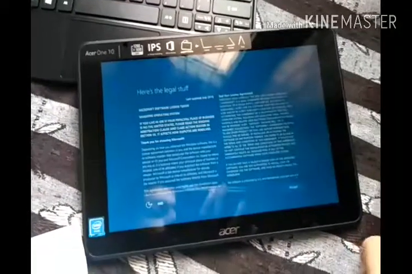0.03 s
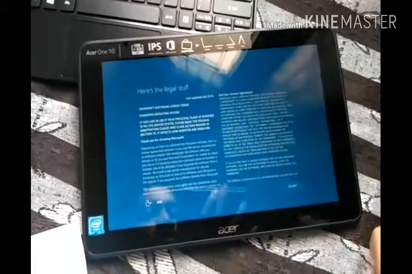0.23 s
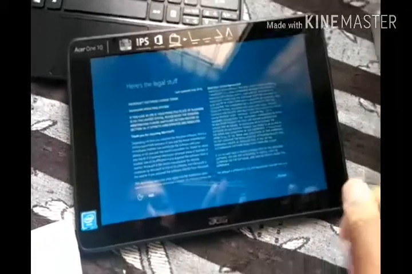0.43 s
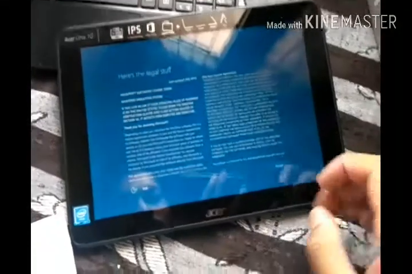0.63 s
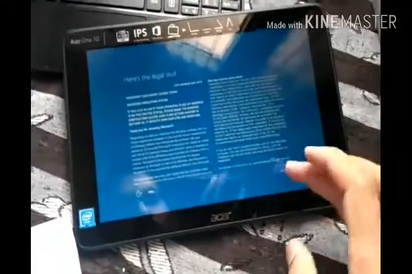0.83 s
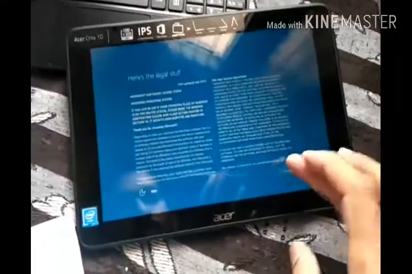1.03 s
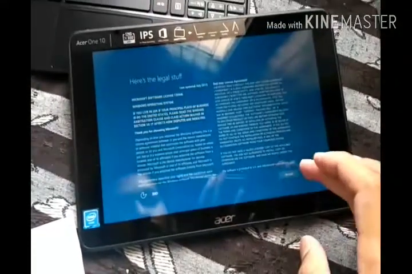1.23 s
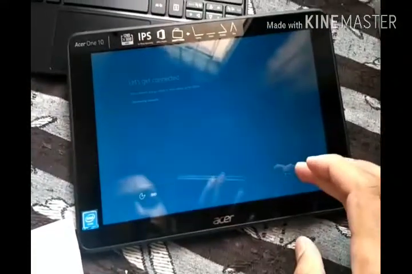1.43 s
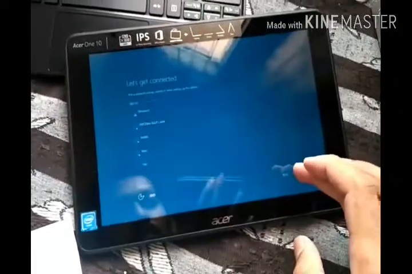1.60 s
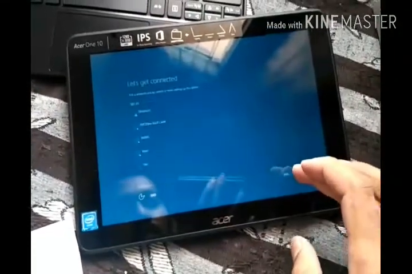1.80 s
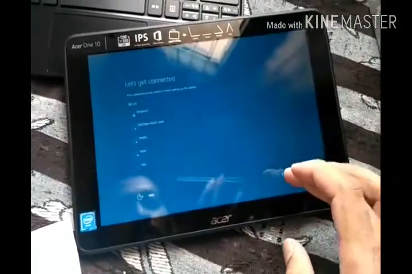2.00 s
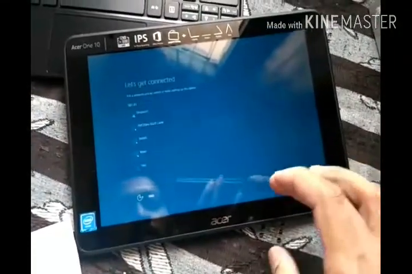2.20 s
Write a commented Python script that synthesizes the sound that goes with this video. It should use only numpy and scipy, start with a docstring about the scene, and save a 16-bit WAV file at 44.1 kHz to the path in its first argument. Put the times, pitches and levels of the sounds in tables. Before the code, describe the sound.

One sharp plastic click from a handled tablet, then a soft tap and faint rustling.

```python
"""A tablet's plastic case gives one sharp click as a hand handles it on a cloth-covered table.
The snap excites the case's resonances, a faint boom of the table and the small, quiet room.
A dull tap and a few faint touches follow, skin and cloth rustle, and twice the hand-held
microphone rumbles. Background rush and hum rise with each sound and sink back,
as through a noise suppressor."""
import sys
import numpy as np
from scipy import signal
from scipy.fft import rfft, irfft
from scipy.io import wavfile

SR = 44100
rng = np.random.default_rng(int(sys.argv[2]) if len(sys.argv) > 2 else 0)


def to_wav(sig):
    """Store sig (one row per channel, or 1-D mono) as 16-bit WAV at the path in sys.argv[1].

    Samples outside -1..1 are clipped; the rate is SR.
    """
    pcm = np.clip(np.atleast_2d(sig), -1, 1) * 32767
    pcm = np.round(pcm).astype(np.int16)
    wavfile.write(sys.argv[1], SR, pcm.T)  # frames by channels


N = 103635
T = np.arange(N) / SR

# level curve of the suppressed background noise: (time [s], level [dB])
SUPPRESSED_NOISE_LEVEL = [(0, -53), (.06, -56), (.115, -62.5), (.15, -53.5), (.21, -52), (.3, -52),
                          (.38, -57), (.45, -62), (.5, -60.5), (.62, -67.5), (.636, -56), (.73, -59),
                          (.76, -62.5), (.8, -59), (.98, -70), (1.06, -63), (1.2, -68.5), (1.36, -71.5),
                          (1.395, -64), (1.47, -68), (1.52, -65.5), (1.665, -69.5), (1.705, -53.5),
                          (1.82, -53.5), (1.92, -57.5), (2.03, -66), (2.15, -70), (2.35, -72)]
# spectrum of the background rush: (frequency [Hz], relative density [dB])
RUSH_SPECTRUM = [(25, -23), (60, 0.5), (100, 0), (180, 1.5), (280, -7.5), (400, -4.5), (600, -4), (800, -9),
                 (1100, -7), (2000, -14.5), (3200, -18.5), (5000, -30.5), (7500, -33.5), (10000, -31.5),
                 (12300, -26.5), (15000, -34.5)]
# tones of the hum: (frequency [Hz], level relative to the rush [dB])
HUM_TONES = [(104, -13), (146, -8), (195, -16), (247, -22), (365, -17), (630, -21)]
# shudders of the microphone: (start [s], duration [s], level [dB], frequency [Hz])
RUMBLES = [(.13, .07, -44, 52.2), (1.686, 0.045, -42.5, 62.2), (1.776, .075, -38.5, 61.3)]
# spectrum of the noise in a shudder: (frequency [Hz], relative density [dB])
RUMBLE_SPECTRUM = [(20, -24), (45, -8), (90, 4), (150, -8.5), (300, -26), (1000, -50)]
# brushes of the hand: (centre time [s], standard deviation [s], level [dB], centre frequency [Hz])
RUSTLES = [(.495, .012, -62, 992), (.725, 0.013, -62, 1310), (1.06, 0.014, -64.5, 1700),
           (1.17, 0.019, -72, 980), (1.508, 0.0049, -65.5, 1030), (1.542, 0.018, -69, 1070),
           (1.721, 0.011, -62, 2200), (1.776, 0.0044, -59.5, 1180), (1.825, 0.039, -61, 1070)]
# finger contacts: (time [s], level [dB], frequency [Hz], relative level of the hollow ring [dB])
TAPS = [(.010, -53.5, 500, 9.5), (.032, -51.5, 480, 9.5), (0.6324, -28.5, 380, -36.5),
        (.785, -51, 154, -26), (1.054, -57.5, 128, -18), (1.22, -57.5, 450, -20), (1.385, -60, 129, -20)]
# spectrum of a tap's reverberation: (frequency [Hz], relative density [dB])
TAP_REVERB_SPECTRUM = [(60, -21.5), (130, -5), (220, -4.5), (340, 4), (600, -5), (780, -13.5), (960, -3.5),
                       (1600, -19.5), (4000, -40)]
# the snap and its rebounds: (time [s], impulse level [dB])
SNAP_IMPULSES = [(0.2367, -2), (.23862, -16.5), (0.239, -17.5), (0.2407, -18.5)]
# the case's resonances and one antiresonance: (frequency [Hz], bandwidth [Hz], gain [dB])
CASE_RESONANCES = [(1647, 210, 14), (2120, 310, 9.5), (3850, 300, 5.5), (4870, 400, 7.5), (5650, 700, 5),
                   (7350, 970, -6), (9190, 400, 7), (10750, 700, 3.5), (11880, 400, 8.5), (12620, 260, 8.5),
                   (13640, 260, 8.5)]
# lightly damped modes of the case: (frequency [Hz], level [dB], 60 dB decay time [s])
RINGING_MODES = [(1729, -50.5, .25), (1895, -44, 0.25), (2050, -49, .22), (11940, -48, .28)]
# spectrum of the click's reverberation: (frequency [Hz], relative density [dB])
CLICK_REVERB_SPECTRUM = [(300, -15.5), (900, -10), (1400, -7), (1900, 0), (3000, -4.5), (4300, -10.5),
                         (5300, -6), (7400, -8.5), (9200, -5.5), (12300, -1.5), (15000, -9)]

CLICK_S = SNAP_IMPULSES[0][0]


def from_db(db):
    """Amplitude grows tenfold for every 20 dB."""
    return 10 ** (np.asarray(db) / 20)


def unit_rms(x):
    """Division by the RMS value gives unit power."""
    return x / np.sqrt(np.mean(x ** 2) + 1e-20)


def coloured_noise(spectrum):
    """Spectral weighting colours white noise; the result has unit power."""
    hz, db = np.transpose(spectrum)
    bin_hz = np.maximum(np.arange(N // 2 + 1) * SR / N, 1)
    gain = from_db(np.interp(np.log(bin_hz), np.log(hz), db))
    return unit_rms(irfft(rfft(rng.standard_normal(N)) * gain, N))


def drift(rate_hz):
    """Low-pass filtering turns white noise into a slow fluctuation of about unit power."""
    pole = np.exp(-2 * np.pi * rate_hz / SR)
    smoothed = signal.lfilter([1], [1, -2 * pole, pole * pole], rng.standard_normal(N + SR))
    return unit_rms(smoothed)[SR:]


def butterworth(x, hz, kind, order=2):
    """A high- or low-pass filter with a maximally flat passband."""
    return signal.sosfilt(signal.butter(order, hz, kind, fs=SR, output="sos"), x + 1e-18)


def resonance(x, hz, width_hz):
    """Forced response of a damped oscillator, with unit peak gain."""
    radius = np.exp(-np.pi * width_hz / SR)
    feedback = [1, -2 * radius * np.cos(2 * np.pi * hz / SR), radius ** 2]
    return signal.lfilter(np.array([1, 0, -1]) * (1 - radius ** 2) / 2, feedback, x + 1e-18)


def decay(start, t60_s):
    """Exponential damping: a sudden onset, then 60 dB lost every t60_s."""
    return (T >= start) * np.exp(-np.log(1000) * np.maximum(T - start, 0) / t60_s)


def damped_mode(start, hz, t60_s):
    """Free vibration of one mode is a decaying sinusoid."""
    return np.sin(2 * np.pi * hz * (T - start)) * decay(start, t60_s)


def background_noise():
    """Amplitude modulation: rush and hum follow a set curve, as through a noise suppressor, over a drone."""
    hum = sum(from_db(db) * np.sqrt(2) * np.sin(2 * np.pi * hz * T + drift(rate_hz=3))
              for hz, db in HUM_TONES)
    drone = rng.standard_normal(N)
    for _ in range(2):
        drone = resonance(drone, hz=60, width_hz=14)
    gain = from_db(np.interp(T, *np.transpose(SUPPRESSED_NOISE_LEVEL)))
    return from_db(-76.5) * unit_rms(drone) + gain * (coloured_noise(RUSH_SPECTRUM) + hum)


def hand_rustles(quality_factor=2.5):
    """Friction of skin and cloth makes grainy noise, heard in short band-limited swells."""
    grain = from_db(4.5 * drift(rate_hz=121))
    friction = butterworth(grain * rng.standard_normal(N), 3280, "low", order=4)
    out = np.zeros(N)
    for centre, spread, db, hz in RUSTLES:
        swell = np.exp(-((T - centre) / spread) ** 2 / 2)
        out += from_db(db) * swell * unit_rms(resonance(friction, hz, hz / quality_factor))
    return out


def microphone_rumble(ramp_s=0.014):
    """Structure-borne sound: the hand shakes the microphone, giving a low, unsteady tone and noise."""
    rub = from_db(-5.5) * coloured_noise(RUMBLE_SPECTRUM)
    wander = 1 + 0.041 * drift(rate_hz=20)
    out = np.zeros(N)
    for start, duration, db, hz in RUMBLES:
        swell = np.clip(np.minimum(T - start, start + duration - T) / ramp_s, 0, 1)
        cycles = np.cumsum((T >= start) * hz * wander) / SR
        out += from_db(db) * swell * (np.sin(2 * np.pi * cycles) + rub)
    return out


def finger_taps(spread_cycles=0.36):
    """A soft impact radiates one push and pull of air; the hollow case rings and the room reverberates."""
    reverb = from_db(-16.5) * coloured_noise(TAP_REVERB_SPECTRUM)
    out = np.zeros(N)
    for time, db, hz, ring_db in TAPS:
        cycles = (T - time) * hz
        pulse = -np.sin(2 * np.pi * cycles) * np.exp(-(cycles / spread_cycles) ** 2 / 2)
        ring = -from_db(ring_db) * damped_mode(time, hz=484, t60_s=0.039)
        out += from_db(db) * (pulse + ring + reverb * decay(time, t60_s=0.23))
    return out


def table_boom(rise_s=0.051):
    """One low mode of the table builds up after the click and dies away through damping."""
    build_up = np.clip((T - CLICK_S) / rise_s, 0, 1)
    return from_db(-41.5) * build_up * damped_mode(CLICK_S, hz=143.3, t60_s=0.45)


def case_click(treble_hold_s=0.082, treble_fade_s=0.027):
    """Impulses excite the case's resonances; case and room ring on, their treble decaying first."""
    body = np.zeros(N)
    for time, db in SNAP_IMPULSES:
        body[int(time * SR)] += from_db(db)
    for hz, width_hz, db in CASE_RESONANCES:
        body += (from_db(db) - 1) * resonance(body, hz, width_hz)
    direct = butterworth(body, 1340, "high", order=4)
    direct = butterworth(direct, 15200, "low")
    ring = sum(from_db(db) * damped_mode(CLICK_S, hz, t60_s) for hz, db, t60_s in RINGING_MODES)
    reverb = from_db(-35.5) * coloured_noise(CLICK_REVERB_SPECTRUM) * decay(CLICK_S, t60_s=0.29)
    tail = ring + reverb
    brightness = np.exp(-np.maximum(T - CLICK_S - treble_hold_s, 0) / treble_fade_s)
    return direct + brightness * tail + (1 - brightness) * butterworth(tail, 1500, "low")


def scene():
    """Superposition: all sources add at one microphone."""
    background = background_noise() + hand_rustles() + microphone_rumble()
    return (background + finger_taps() + table_boom() + case_click())[None]


def record(dry):
    """Band limiting: a steep low-pass filter removes the highest treble."""
    return signal.fftconvolve(dry, signal.firwin(255, cutoff=15400, fs=SR)[None], "same")


dry = scene()
out = record(dry)
to_wav(out)
```